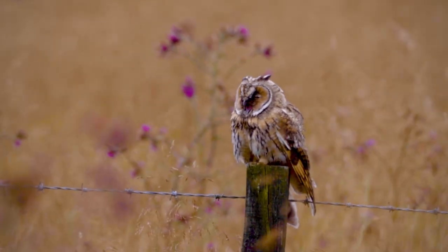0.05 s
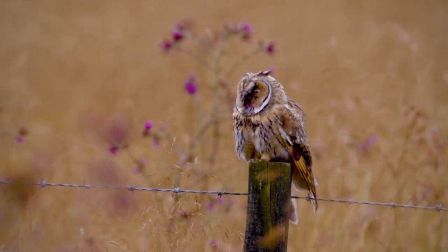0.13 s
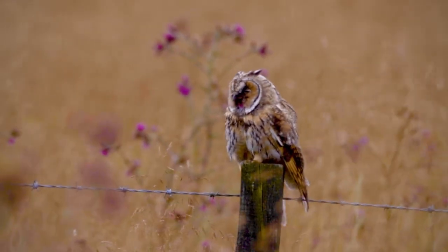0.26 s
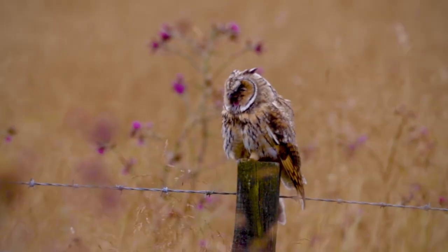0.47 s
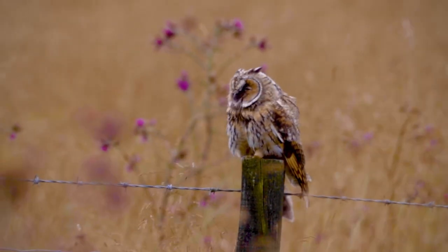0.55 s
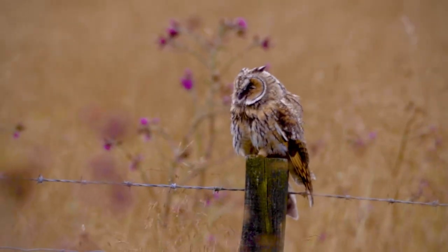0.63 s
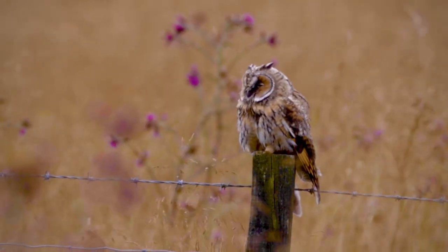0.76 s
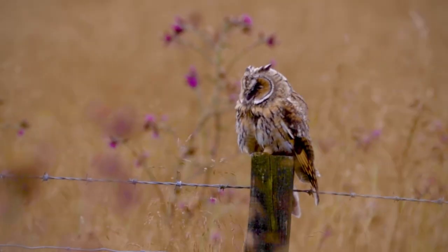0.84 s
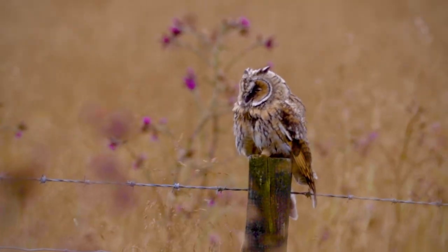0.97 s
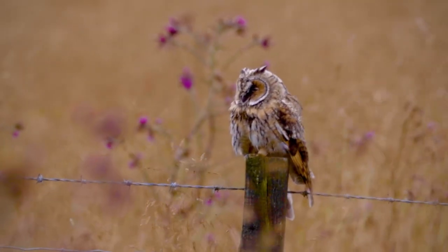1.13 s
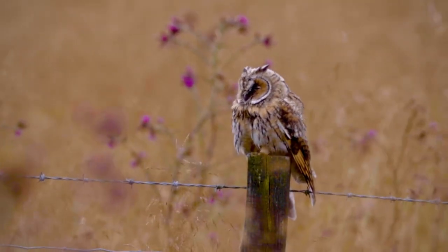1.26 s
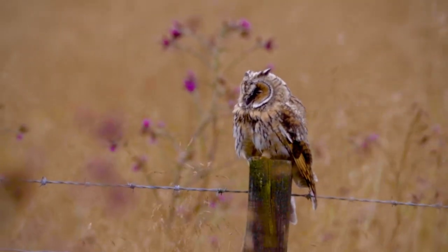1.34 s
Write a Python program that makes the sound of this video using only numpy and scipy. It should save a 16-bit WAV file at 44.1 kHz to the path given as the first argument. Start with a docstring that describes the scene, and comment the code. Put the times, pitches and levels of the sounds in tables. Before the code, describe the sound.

A young owl gives one thin, drawn-out squeak after two sharp clicks, over faint wind.

```python
"""An open field, where a young owl on a fence post gives one thin squeak that arches and sags in pitch.
Its voice is a periodic vibration, heard as a harmonic series, which frays as it stops.
Close by, two sharp clicks and a few ticks ring in damped modes, among soft rustles and low bumps of air.
A light scuff, a faint distant peep and a brief hiss follow the call.
A light wind murmurs throughout, and the field reflects the squeak as a faint echo and tail."""
import sys
import numpy as np
from scipy import signal
from scipy.fft import rfft, irfft
from scipy.io import wavfile

SR = 44100
rng = np.random.default_rng(int(sys.argv[2]) if len(sys.argv) > 2 else 0)


def waveform_to_disk(signal):
    """Save audio, clipped to [-1, 1], as 16-bit WAV at the path in sys.argv[1]."""
    frames = np.transpose(np.atleast_2d(signal))
    scaled = np.clip(frames, -1, 1) * 32767
    samples = np.round(scaled).astype(np.int16)
    wavfile.write(sys.argv[1], SR, samples)


N = 61739
T = np.arange(N) / SR

# relative spectral density of the wind: frequency_hz, level_db
WIND_SPECTRUM = [(15, -26), (28, -9.5), (60, -8), (195, -5.5), (280, -2), (380, -4), (537, -3), (680, -8.5),
                 (880, -7), (1250, -9), (1900, -14), (4000, -20), (8000, -26), (15500, -34)]
# strength of the wind: time_s, level_db
WIND_LEVEL = [(0, -58.5), (.3, -58), (.8, -59), (1.05, -59.5), (1.4, -60.5)]
# soft rustles: start_s, length_s, level_db, tilt_db_per_octave
RUSTLES = [(0.09, 0.044, -67, 10.5), (0.187, 0.054, -57, -7.5), (0.813, 0.083, -63.5, -2.5)]
# spectrum of a rustle before its tilt: frequency_hz, gain_db
RUSTLE_SPECTRUM = [(100, -57), (600, -9), (1500, 3), (2800, 0.5), (4700, -6), (7000, -13), (15000, -28.5)]
# bumps of air on the microphone: start_s, length_s, pitch_hz, level_db
BUMPS = [(.117, .02, 450, -48), (.352, .018, 135, -54), (.478, .026, 75, -52), (.547, .022, 112, -48),
         (.58, .013, 390, -50), (.69, .025, 60, -56), (.722, .02, 110, -48), (.738, .028, 65, -50)]

# clicks and ticks: start_s, level_db, tilt_db_per_octave, low_edge_hz
CLICKS = [(0.198, -54, -9, 900), (0.2048, -50, 2, 1300), (0.2075, -41, -4, 900), (0.214, -42.5, 2.5, 1500),
          (0.2192, -29.5, 1.5, 1660), (0.2224, -44, 0, 1520), (0.2382, -50, -18, 800),
          (0.347, -25, -3, 1080), (0.3484, -41, -4, 1020), (.698, -55.5, -20, 700), (.745, -50, -8, 1100)]
# resonances of a click: frequency_hz, gain_db, t60_s
CLICK_MODES = [(1262, -13.5, 0.058), (1590, -12, 0.018), (1816, 8, 0.0041), (2330, -0.5, 0.0089),
               (2960, -14, 0.022), (4170, 3.5, 0.0059), (4640, -19, 0.0099), (5370, -17, 0.0089)]
# spectrum of the snap at contact: frequency_hz, gain_db
SNAP_SPECTRUM = [(1000, -9), (5000, 5.5), (15000, -16)]
# spectrum of the sound scattered after a click: frequency_hz, gain_db
SCATTER_SPECTRUM = [(200, -4), (900, 0), (1700, 2), (4300, 2), (7000, -19), (15000, -44)]

# fundamental of the squeak: time_s, pitch_hz
SQUEAK_PITCH = [(.298, 2380), (.302, 2167), (.311, 2160), (.338, 2203), (.37, 2224), (.412, 2233),
                (.49, 2211), (.512, 2182), (.548, 2145), (.61, 2065), (.648, 2035), (.655, 2062)]
# strength of the squeak: time_s, level_db
SQUEAK_LEVEL = [(.3, -44.5), (.316, -39.2), (.335, -37.3), (.362, -39), (.43, -37.4), (.5, -37),
                (.53, -39.3), (.595, -38.7), (.655, -44)]
# overtone gains relative to the fundamental: time_s, second_harmonic_db, higher_harmonics_db
BRIGHTNESS = [(.3, 1.5, 2.5), (.32, -2.5, 0.5), (.345, -2, -1.5), (.365, -0.8, -1), (.42, -3, -3.5),
              (.5, -4, -1.5), (.55, -1.5, 1), (.595, -2, -1), (.608, -7, 2), (.655, -7, 1.5)]
# higher harmonics at high and at sagged pitch: multiple, high_db, sagged_db
OVERTONES = [(3, -9, -10.5), (4, -16, -10.5), (5, -22.5, -21.5), (6, -28, -17.5), (7, -42, -35)]
# weak partials halfway between the harmonics: multiple, gain_db
HALF_HARMONICS = [(1.5, -35), (2.5, -21), (3.5, -35.5), (4.5, -31)]
# shared gain of those partials, which come and go: time_s, gain_db
HALF_GAIN = [(.312, 4), (.338, -1), (.368, -5), (.415, -3), (.437, -1), (.497, -2.5), (.521, -15),
             (.565, -0.5), (.635, 0)]
# reflection spectrum of the field: frequency_hz, gain_db
FIELD_SPECTRUM = [(500, -12), (2100, -32), (3900, -3), (4130, 1.5), (4380, -3), (6300, -2.5), (9000, -14)]

# a light scuff: start_s, length_s, level_db
SCUFF = (.72, .033, -55)
# thin resonances of the scuff: frequency_hz, gain_db
SCUFF_SPECTRUM = [(300, -14), (1400, 4.5), (3100, -6), (3600, 1), (4350, -9), (4700, 3.5), (5200, -13),
                  (5900, -5), (6600, -20), (15000, -27)]
# a distant peep: start_s, length_s, pitch_hz, level_db
PEEP = (.848, .018, 3250, -59)
# an airy hiss: start_s, length_s, level_db
HISS = (.893, 0.11, -61.5)
# spectrum of the hiss: frequency_hz, gain_db
HISS_SPECTRUM = [(300, -10), (2100, 3.5), (3200, -10), (4300, -4), (8000, -23), (10300, -6), (12000, -16),
                 (13800, -6), (15000, -14)]


def amp(db):
    """Amplitude grows tenfold for every 20 decibels."""
    return 10 ** (np.asarray(db) / 20)


def unit(x):
    """Normalisation to an rms of one."""
    return x / np.sqrt(np.mean(x ** 2) + 1e-20)


def curve(rows):
    """Linear interpolation of each column of a time table."""
    times, *columns = np.transpose(rows)
    return [np.interp(T, times, column) for column in columns]


def add(mix, start_s, sound):
    """Superposition: a sound adds to the mix from its start time."""
    part = mix[max(round(start_s * SR), 0):][:len(sound)]
    part += sound[:len(part)]


def colour(x, spectrum, tilt_db=0):
    """Linear filtering: each frequency is weighted by a spectrum and a tilt per octave."""
    hz = np.fft.rfftfreq(len(x), 1 / SR) + 1
    knots_hz, knots_db = np.transpose(spectrum)
    gain_db = np.interp(np.log(hz), np.log(knots_hz), knots_db)
    octaves = np.log2(np.maximum(hz, knots_hz[0]) / knots_hz[0])
    return irfft(rfft(x) * amp(gain_db + tilt_db * octaves), len(x))


def wander(rate_hz):
    """Low-passed noise: a smooth random fluctuation with an rms of one."""
    hz = np.fft.rfftfreq(N, 1 / SR)
    lowpass = np.exp(-(hz / rate_hz) ** 2) * (hz > 0)
    return unit(irfft(rfft(rng.standard_normal(N)) * lowpass, N))


def wind(flutter_db=1):
    """Wind murmurs as broadband noise, mostly low, under slight amplitude modulation."""
    murmur = unit(colour(rng.standard_normal(N), WIND_SPECTRUM))
    return murmur * amp(curve(WIND_LEVEL)[0] + flutter_db * wander(rate_hz=18.4))


def rustle(spectrum, length_s, level_db, tilt_db=0, taper=0.48):
    """Filtered noise under a smooth envelope; its spectrum makes it a rustle, a scuff or a hiss."""
    noise = unit(colour(rng.standard_normal(N), spectrum, tilt_db))
    envelope = signal.windows.tukey(round(length_s * SR), taper)
    return amp(level_db) * envelope * noise[:len(envelope)]


def bump(length_s, pitch_hz, level_db):
    """Air on the microphone makes a brief pressure oscillation of uneven period."""
    envelope = np.hanning(round(length_s * SR))
    cycles = np.cumsum(pitch_hz * (1 + .2 * wander(rate_hz=167)[:len(envelope)])) / SR
    return amp(level_db) * envelope * np.sin(2 * np.pi * cycles)


def click(level_db, tilt_db, low_edge_hz, rise_s=0.001, scatter_t60_s=0.033, snap_t60_s=0.014):
    """A small hard impact excites damped modes, with a snap at contact and scattered sound after it."""
    t = np.arange(SR // 10) / SR
    ring = np.zeros(len(t))
    for k, (hz, gain_db, t60_s) in enumerate(CLICK_MODES):
        mode_db = gain_db + tilt_db * np.log2(hz / 2200) - 60 * t / t60_s
        ring += (-1) ** k * amp(mode_db) * np.sin(2 * np.pi * hz * t)
    rise = np.sin(np.pi / 2 * np.minimum(t / rise_s, 1)) ** 2
    ring = signal.sosfilt(signal.butter(4, low_edge_hz, "high", fs=SR, output="sos"), ring * rise)
    scatter = unit(colour(rng.standard_normal(len(t)), SCATTER_SPECTRUM, tilt_db))
    scatter *= amp(-16 - 60 * t / scatter_t60_s)
    snap = colour(rng.standard_normal(len(t)), SNAP_SPECTRUM, tilt_db)
    snap *= amp(-20.5 - 60 * t / snap_t60_s)
    return amp(level_db) * (ring + rise * (scatter + snap))


def squeak():
    """The owl's nearly periodic voice gives a harmonic series, roughened by random modulation."""
    start_s, attack_s, fray_s, end_s, release_s = .2982, 0.006, .649, .667, 0.01
    high_hz, sagged_hz = 2147, 2097
    shimmer_db, flutter_db, rasp_db = 1.25, 3.5, -41
    pitch_hz = curve(SQUEAK_PITCH)[0]
    second_db, higher_db = curve(BRIGHTNESS)
    sag = np.clip((high_hz - pitch_hz) / (high_hz - sagged_hz), 0, 1)
    jitter = np.where(T > fray_s, 0.0078, 0.0011) * wander(rate_hz=170)
    phase = 2 * np.pi * np.cumsum(pitch_hz * (1 + jitter)) / SR
    voice = np.sin(phase) + amp(second_db) * np.sin(2 * phase)
    for multiple, high_db, sagged_db in OVERTONES:
        overtone_db = high_db + (sagged_db - high_db) * sag + higher_db  # brighter as the pitch sags
        voice += amp(overtone_db + shimmer_db * wander(rate_hz=20)) * np.sin(multiple * phase)
    half_gain = amp(curve(HALF_GAIN)[0])
    for multiple, gain_db in HALF_HARMONICS:
        voice += half_gain * amp(gain_db + flutter_db * wander(rate_hz=110)) * np.sin(multiple * phase)
    voice *= 1 + amp(rasp_db) * wander(rate_hz=5300)
    gate = np.clip((T - start_s) / attack_s, 0, 1) * np.clip((end_s - T) / release_s, 0, 1)
    return voice * gate * amp(curve(SQUEAK_LEVEL)[0])


def field(call, delay_s=.1, echo_db=-25, tail_db=-18.5, t60_s=0.76):
    """Reflection returns one far echo; scattering from grass and fence leaves a diffuse tail."""
    reflected = colour(call, FIELD_SPECTRUM)
    echo = np.interp(T - delay_s, T, reflected, left=0)
    response = rng.standard_normal(N) * amp(-60 * T / t60_s)
    tail = signal.fftconvolve(reflected, response / np.linalg.norm(response))[:N]
    return amp(echo_db) * echo + amp(tail_db) * tail


def peep(length_s, pitch_hz, level_db):
    """A short pure tone whose frequency glides slightly downward."""
    envelope = np.hanning(round(length_s * SR))
    glide_hz = pitch_hz * np.linspace(1.05, .95, len(envelope))
    return amp(level_db) * envelope * np.sin(2 * np.pi * np.cumsum(glide_hz) / SR)


def scene():
    """Superposition of the owl, its reflections, the small noises and the wind in one channel."""
    owl, noises = squeak(), np.zeros(N)
    for start_s, *row in CLICKS:
        add(noises, start_s, click(*row))
    for start_s, *row in RUSTLES:
        add(noises, start_s, rustle(RUSTLE_SPECTRUM, *row))
    add(noises, SCUFF[0], rustle(SCUFF_SPECTRUM, *SCUFF[1:]))
    add(noises, HISS[0], rustle(HISS_SPECTRUM, *HISS[1:], taper=0.76))
    add(noises, PEEP[0], peep(*PEEP[1:]))
    for start_s, *row in BUMPS:
        add(noises, start_s, bump(*row))
    return (owl + field(owl) + noises + wind())[None]


def record(dry):
    """Band limiting: a low-pass filter removes the highest treble."""
    edge_hz = 15700
    lowpass = signal.firwin(511, edge_hz, window=("kaiser", 9), fs=SR)
    return signal.oaconvolve(dry, lowpass[None], "same")


dry = scene()
out = record(dry)
waveform_to_disk(out)
```